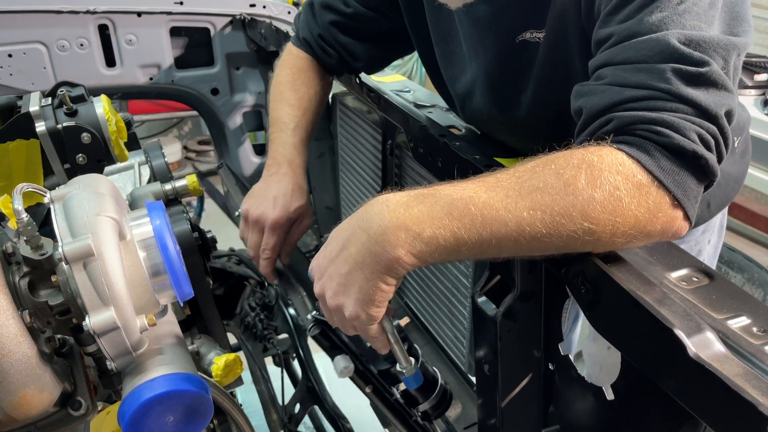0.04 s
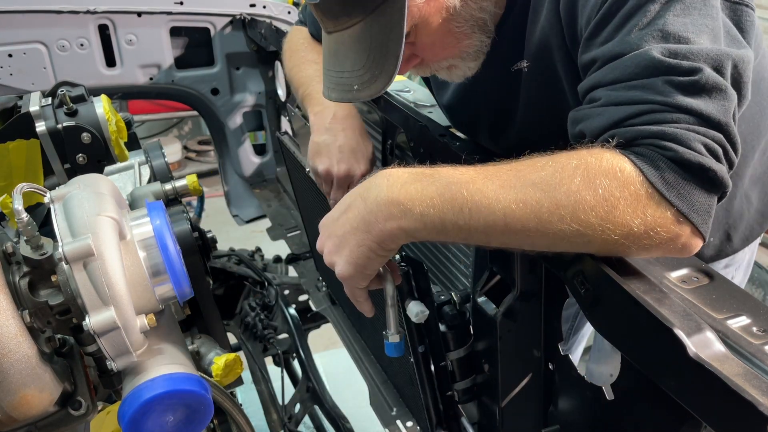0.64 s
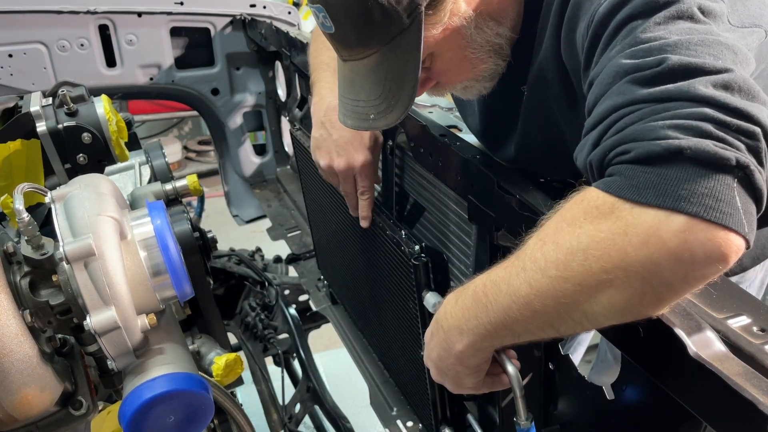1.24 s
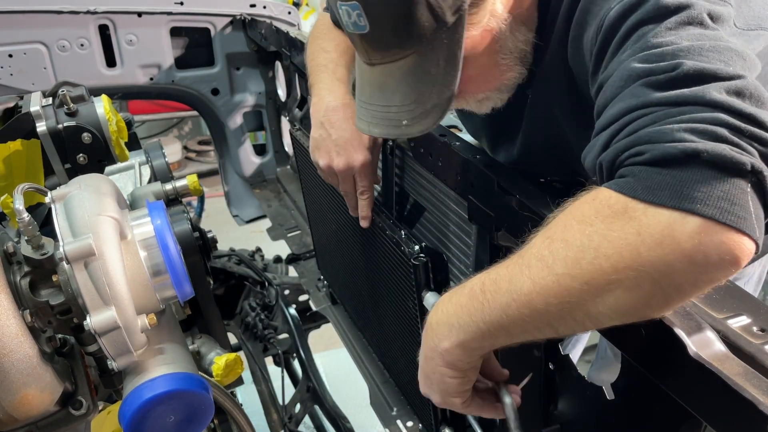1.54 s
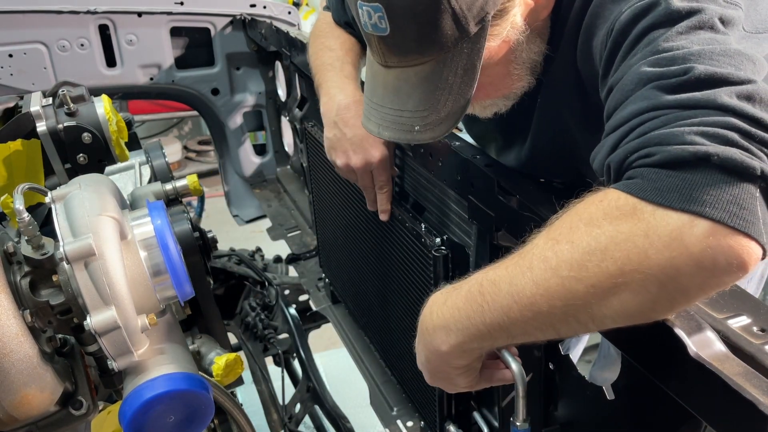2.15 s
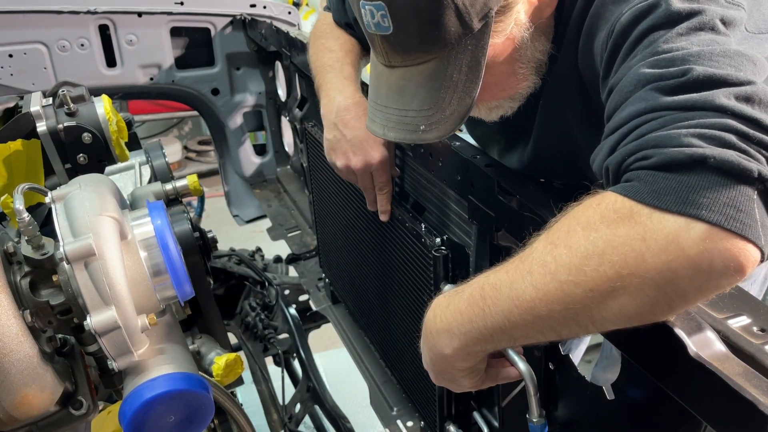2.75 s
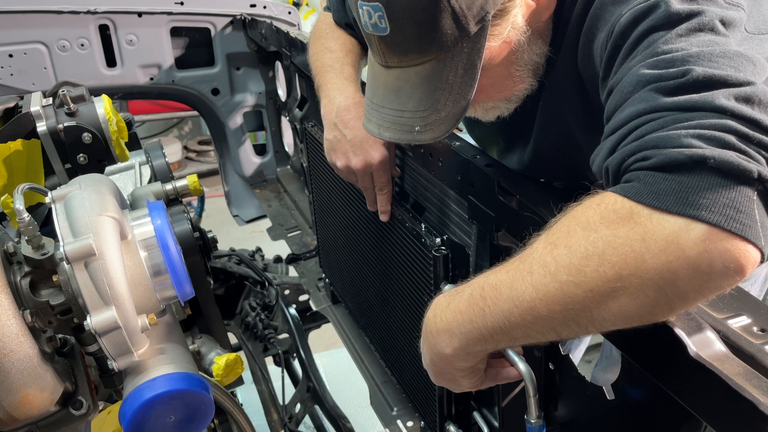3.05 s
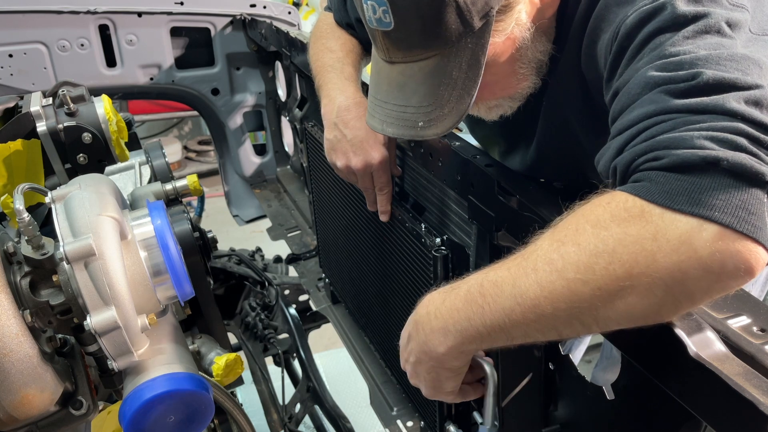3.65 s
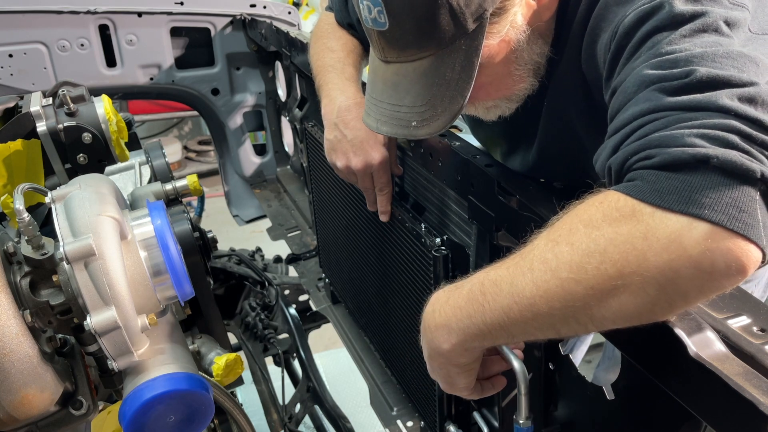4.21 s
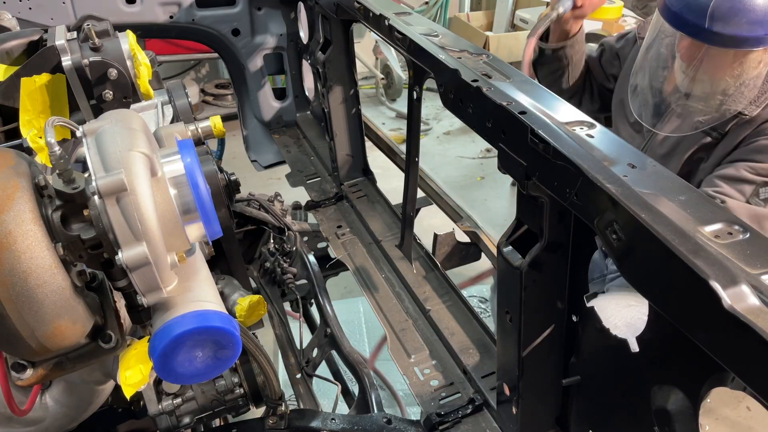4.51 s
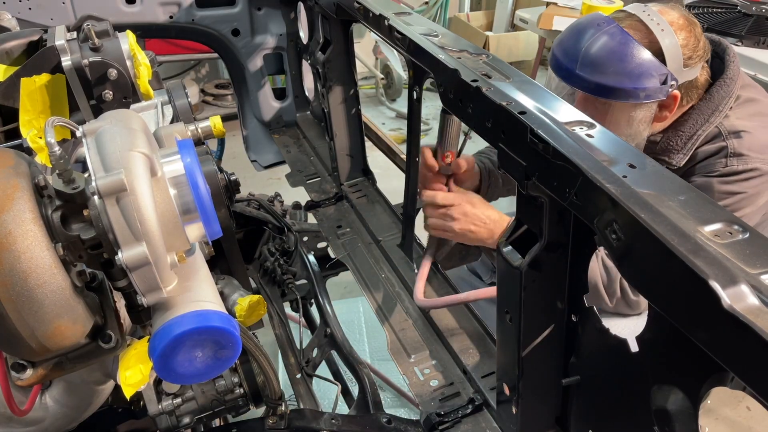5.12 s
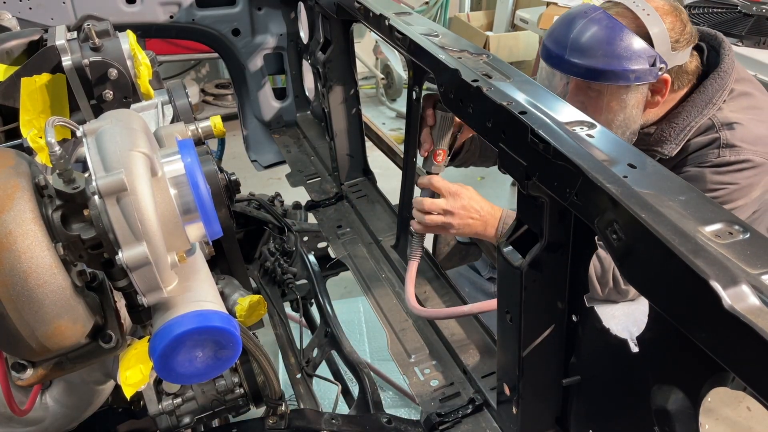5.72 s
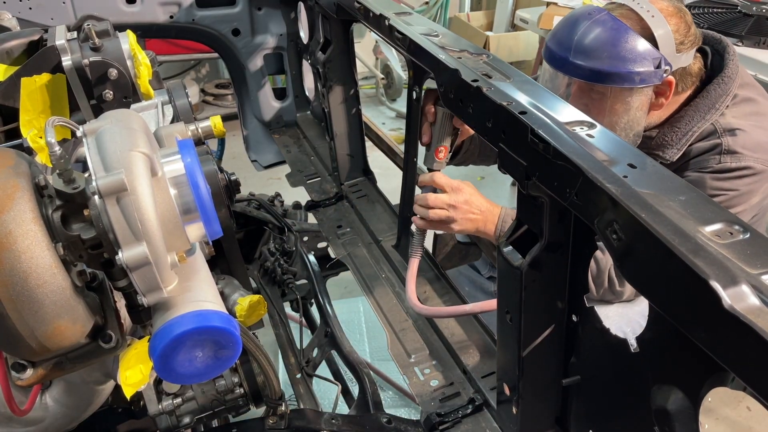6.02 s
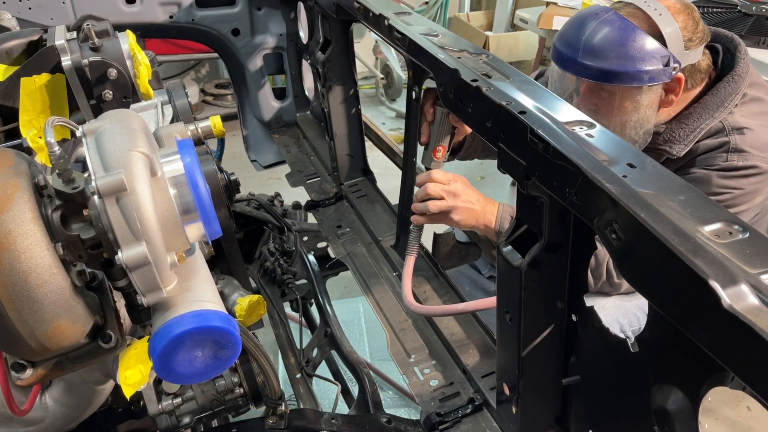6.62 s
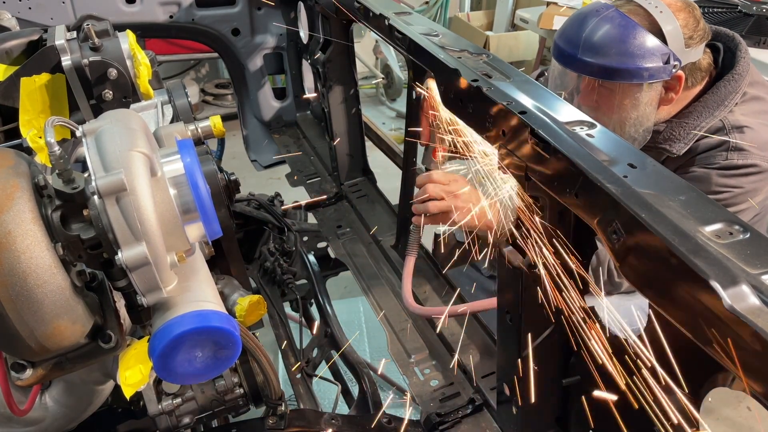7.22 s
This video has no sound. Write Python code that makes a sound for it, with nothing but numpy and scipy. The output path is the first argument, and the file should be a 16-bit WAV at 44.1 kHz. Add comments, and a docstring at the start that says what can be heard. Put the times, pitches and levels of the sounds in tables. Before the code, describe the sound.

A metal pipe knocks over a low fan hum, then a blower roars, air hisses and a pneumatic grinder cuts into steel and whines.

```python
"""In a garage, at a car's front frame. A fan hums, a sleeve rustles and a metal pipe knocks against the
radiator, exciting the damped modes of both. Abruptly a blower roars and a jet hisses from an air hose
while a cut-off grinder is set against the frame. Its disc bites, nearly stalls and drives the steel
into resonance, then spins up to a whine, a harmonic series on the spindle rate that sags under load."""
import sys
import numpy as np
from scipy import signal
from scipy.fft import rfft, irfft, next_fast_len
from scipy.io import wavfile
from scipy.ndimage import uniform_filter1d

SR = 44100
rng = np.random.default_rng(int(sys.argv[2]) if len(sys.argv) > 2 else 0)


def transcribe(signal):
    """Save signal, clipped to [-1, 1], as a 16-bit WAV file at the path in sys.argv[1]."""
    frames = np.atleast_2d(signal).T
    limited = np.clip(frames, -1, 1)
    pcm = np.round(limited * 32767).astype(np.int16)
    wavfile.write(sys.argv[1], SR, pcm)


N = 324576
T = np.arange(N) / SR

# Levels in a table are relative to one another; noise spectra give level per unit bandwidth.
# spindle rate, dragged down whenever the disc digs in: t/s, f/Hz
SPINDLE_RATE = [(6.235, 50), (6.31, 109), (6.455, 115), (6.505, 142), (6.565, 147), (6.65, 103), (6.69, 96),
                (6.72, 150), (6.75, 255), (6.79, 347), (6.84, 422), (6.88, 434), (6.922, 420), (7.004, 377),
                (7.105, 282), (7.145, 264), (7.235, 366), (7.295, 368), (7.36, 359)]
# grinding under the push of the hand: t/s, level/dB
PUSH_LEVEL = [(6.23, -18), (6.38, -19.5), (6.495, -26.5), (6.6, -22.5), (6.79, -22), (6.86, -33),
              (7.0, -32), (7.1, -31), (7.22, -34.5), (7.36, -47)]
# spans in which the disc runs without snatching: start/s, end/s
EASY_SPANS = [(6.821, 6.92), (7.219, 7.36)]
# tone of the rotor vanes: t/s, level/dB
VANE_LEVEL = [(6.24, -34), (6.31, -32), (6.39, -40.5), (6.53, -32.5), (6.7, -36.5), (6.86, -42.5),
              (7.02, -36.5), (7.13, -39), (7.3, -42)]
# partials of the whine: multiple of the spindle rate, level/dB
WHINE_ORDERS = [(1, -25), (2, -18), (3, -17), (5, -7.5), (6, -8.5), (7, -15), (8, -1), (9, -6), (10, -19),
                (11, -7), (12, -8.5), (13, -10), (14, -5), (15, -14), (16, -3.5), (17, -9), (18, -5.5),
                (19, -19), (20, -13), (22, -9), (23, -21), (24, -11), (25, -19), (26, -12), (28, -5),
                (29, -16), (32, -10), (33, -11), (34, -18), (35, -10), (37, -19), (42, -10), (44, -12)]
# modes of the steel frame: f/Hz, bandwidth/Hz, level/dB
FRAME_MODES = [(1016, 45, -13), (1364, 17, -1), (1557, 12, -3.5), (1730, 60, -13), (2304, 19, -2),
               (2474, 16, 2.5), (2990, 30, -8.5), (3255, 41, -2), (3360, 20, -3), (3414, 59, -5.5),
               (3846, 42, 0), (4030, 52, -9), (4620, 68, -5), (4920, 52, -11), (5750, 63, -10),
               (6170, 25, -2), (6500, 58, -12.5), (6780, 64, -12.5), (7180, 44, -10.5), (7600, 51, -7),
               (7960, 37, -7), (8120, 60, -12), (9090, 21, -7.5), (9530, 55, -16), (9560, 50, -10),
               (9860, 41, -11), (10600, 70, -13), (10750, 62, -17), (11130, 100, -12)]
# abrasion noise: f/Hz, level/dB
GRIT_SPECTRUM = [(180, -39), (300, -21), (565, -9), (624, -8), (1870, -3), (2400, 0.5), (2700, -4.5),
                 (3290, -11), (4300, -0.5), (6000, -3.5), (16000, -15)]
# spent air: f/Hz, level/dB
EXHAUST_SPECTRUM = [(240, -41), (400, -3), (453, -33), (839, -18), (949, -26), (1380, -5), (2710, 0),
                    (3870, -20), (4240, -8), (4580, -8.5), (16000, 4.5)]
# resonances of the exhaust ports: f/Hz, bandwidth/Hz, level/dB
PORT_MODES = [(7850, 210, -13), (10950, 430, -0.5), (12830, 350, -2), (15550, 400, -3)]
# the disc chatters on a resonance of the frame: t/s, duration/s, f/Hz, level/dB
CHATTER_SQUEALS = [(6.262, 0.052, 3290, -27), (6.297, 0.033, 2480, -35), (6.305, 0.12, 6105, -31.5),
                   (6.335, 0.058, 3260, -27), (6.345, 0.065, 2470, -29.5), (6.36, .11, 3410, -28.5),
                   (6.435, 0.036, 3880, -31), (6.515, .04, 3880, -31), (6.545, 0.05, 2475, -36),
                   (6.96, 0.085, 4640, -35.5)]
# the tool touches the frame: t/s, scrape/dB, chime/dB, ring/dB, ring f/Hz, scrape and ring t60/s
TOOL_TAPS = [(4.787, -46, -37.5, -31, 1914, 0.23), (4.805, -39, -37.5, -35.5, 1927, 0.35),
             (4.86, -33.5, -33, -35.5, 1780, 0.34), (5.01, -36, -42, -38, 983, 0.35),
             (5.021, -44, -39, -35, 7280, 0.1), (5.14, -45.5, -54, -47, 1430, 0.14),
             (5.262, -31.5, -40, -35.5, 2100, 0.12), (5.398, -36.5, -48, -40, 1346, 0.17),
             (5.499, -44.5, -54, -40.5, 1388, 0.11), (5.889, -45, -50, -42.5, 3260, 0.15)]
# modes of the grinder's body: f/Hz, level/dB
HOUSING_MODES = [(1790, -6), (2400, -11), (2930, -9.5), (3440, -12), (3930, -9), (4400, -11), (5380, -9),
                 (5990, -5.5), (7200, -11.5), (9300, -12)]
# pipe on radiator: t/s, crack/dB, clunk/dB, clatter/dB, sizzle/dB, clatter t60/s
PIPE_KNOCKS = [(1.041, -31, -45, -52.5, -61, 0.24), (1.084, -37, -54, -48.5, -39.5, 0.43),
               (1.155, -34, -45, -31.5, -26.5, .16), (1.481, -59, -75, -57, -72, 0.12),
               (1.512, -67, -62, -51, -76, 0.22), (1.845, -49.5, -71, -76, -67, 1),
               (1.991, -41, -31.5, -34.5, -41, 0.16), (2.101, -62, -34.5, -47.5, -66, 0.11),
               (2.165, -66, -46.5, -56, -66, 0.2), (4.124, -38.5, -51, -63, -52, 0.19)]
# ringing partials of the radiator, struck by the pipe: t/s, f/Hz, level/dB
RADIATOR_RINGS = [(1.045, 1190, -33), (1.088, 650, -39.5), (1.16, 2400, -34), (1.998, 843, -23),
                  (1.997, 1332, -29), (1.993, 2864, -36), (1.993, 3876, -43), (1.995, 390, -30),
                  (2.091, 1330, -49)]
# modes of the radiator and of the pipe: f/Hz, bandwidth/Hz, level/dB
RADIATOR_MODES = [(382, 79, 1.5), (540, 78, 3), (660, 92, -0.5), (844, 41, 6), (1163, 43, 0.5),
                  (1339, 20, 1), (1490, 88, -8), (1670, 26, -3.5), (1930, 94, -8)]
PIPE_MODES = [(1990, 600, 5.5), (2560, 290, 6), (2910, 280, 4), (4180, 820, -2.5), (5330, 1400, -9.5)]
# hiss of the moving hose: t/s, level/dB, midrange lift/dB
LEAK_LEVEL = [(4.345, -55.5, 8), (4.465, -42.5, 3), (4.54, -50, 3), (4.72, -38, 2), (4.95, -40, 3.5),
              (5.16, -38.5, 0), (5.28, -40.5, 1), (5.44, -38.5, -2.5), (5.75, -41, -1), (6.15, -43, 0.5)]
# jet at the coupling: f/Hz, level/dB
LEAK_SPECTRUM = [(880, -18), (1500, -10.5), (2720, -11.5), (3220, -8.5), (5540, -12), (8400, -7.5),
                 (10200, -7), (12900, -2), (15200, 0.5), (16000, -4)]
# centre of the jet's breathy whistle: t/s, f/Hz
LEAK_PITCH = [(4.45, 14440), (4.76, 15300), (4.9, 14000), (5.05, 14000), (5.18, 12700), (5.3, 15000),
              (5.42, 13500), (5.78, 13100), (6.1, 14300)]
# the blower's air noise, duct tones and mains hum: f/Hz, level/dB
BLOWER_SPECTRUM = [(25, -79), (45, -27), (64, -2.5), (90, -5), (120, 1.5), (155, 3.5), (210, -6.5),
                   (260, 2.5), (385, -0.5), (460, -5), (690, -5), (780, -13.5), (900, -15), (1150, -19.5),
                   (1600, -27), (4000, -34)]
DUCT_TONES = [(145, -44.5), (376.8, -37.5), (414.5, -44.5), (479.1, -49), (597.5, -45), (672.9, -44),
              (802.1, -54)]
MAINS_TONES = [(119.0, -39.5), (241.0, -43.5)]
# swishes of the sleeve: t/s, hold/s, level/dB
SWISHES = [(0.08, 0.084, -61.5), (0.24, 0.061, -52.5), (0.463, 0.045, -62), (0.702, 0.049, -55.5),
           (0.823, 0.025, -62.5)]
# rubbing cloth: f/Hz, level/dB
CLOTH_SPECTRUM = [(530, -33), (900, -5), (1030, -2), (4150, -6.5), (7490, -13), (15200, -13.5), (16000, -9)]
# the fan's tones and air noise: f/Hz, level/dB
FAN_TONES = [(113.0, -53), (140.0, -54.5), (166.9, -55), (242.2, -57), (306.8, -64.5), (393.0, -74.5),
             (419.9, -74), (452.2, -69)]
FAN_SPECTRUM = [(15, -87), (25, -47.5), (102, -7), (170, -2), (200, -12.5), (236, -5.5), (270, -14.5),
                (309, -20.5), (335, -17.5), (451, -21), (489, -26.5), (607, -26.5), (1190, -38.5),
                (5140, -49.5), (16000, -65)]
# the fan's whistles: f/Hz, bandwidth/Hz, level/dB
FAN_RESONANCES = [(1523, 45, -78.5), (5230, 580, -81)]
# left-right coherence of the fan's air and of the other noises: f/Hz, coherence
FAN_COHERENCE = [(60, 0.97), (180, 1), (550, 0.67), (1650, 0.0), (4970, 0.14), (15000, 0.52)]
COHERENCE = [(60, 1), (130, 0.99), (290, 0.93), (640, 0.58), (1400, 0.41), (3000, 0.55), (7000, 0.5),
             (14000, 0.67)]
# level difference from the place of work: f/Hz, left minus right/dB
EAR_DIFFERENCE = [(60, 0.0), (150, 1), (380, -3), (950, 3.5), (2380, 0), (5980, 1.5), (15000, 1.5)]

FULL_SPEED_HZ, TRIGGER_S = 430, 6.23   # the grinder's nominal spindle rate and its start
BLOWER_START_S = 4.321


def grinder():
    """Rotating machinery: a four-vane air motor turns the disc; speed and push govern its sound."""
    speed = uniform_filter1d(in_time(SPINDLE_RATE)[0], size=SR // 30)
    octaves = np.log2(speed / FULL_SPEED_HZ)
    grind_db = grinding_db()
    easy = sum(after(start_s, 0.026) - after(end_s, 0.026) for start_s, end_s in EASY_SPANS)
    running = after(TRIGGER_S, rise_s=0.024)
    # snatching modulates the speed and blurs the upper partials, most when the motor labours
    flutter = (.004 + .018 * np.minimum(octaves ** 2, 1)) * (1 - easy) + .0015 * easy
    angle = 2 * np.pi * np.cumsum(speed * (1 + flutter * drift(450))) / SR
    motor = running * (vanes(angle, speed, easy) + whine(angle, octaves, grind_db, easy))
    rush = abrasion(angle, speed, grind_db) + exhaust(angle, octaves, grind_db, running)
    rush *= from_db(-2.5 * easy)
    return garage(motor, wet_db=-3, t60=0.18, shared=0.68) + band(rush, 220, 15300, order=1)


def grinding_db():
    """Contact force sets the grinding level: the disc grazes, bites, then follows the hand."""
    push_db, = in_time(PUSH_LEVEL)
    graze_db = -1398 * np.maximum(6.233 - T, 0)
    bite_db = 5 * np.exp(-((T - 6.243) / 0.01) ** 2)
    return push_db + graze_db + bite_db


def whine(angle, octaves, grind_db, easy):
    """Forced vibration: harmonics of the spindle rate swell as they pass through resonances."""
    pressure = np.minimum(from_db(grind_db + 29), 1)
    snatching = 1 - easy
    speed_db = 14 * octaves
    whine_db = -29.3 + speed_db - 3 * pressure ** 2 * snatching   # a hard push smothers the whine
    tone, on = np.zeros(N), T > TRIGGER_S
    for k in np.setdiff1d(np.arange(1, 45), 4):   # the vanes supply the fourth harmonic
        level_db = whine_db[on] + np.interp(k, *np.transpose(WHINE_ORDERS)) + 2 * drift(40, T[on])
        level_db += 4 * snatching[on] * drift(110, T[on])
        # the rim's grit repeats every turn, adding partials that peak at the twelfth
        above_peak = np.log2(k / 12)
        rim_db = -36.5 + min(12 * above_peak, -5 * above_peak)
        rim = pressure[on] * snatching[on] * from_db(rim_db + speed_db[on] + 5 * drift(110, T[on]))
        tone[on] += np.hypot(from_db(level_db), rim) * np.sin(k * (angle[on] + 2 * np.pi * rng.random()))
    tone *= 1 + .3 * pressure * drift(600)   # rasp under pressure
    # the disc screams only near full speed
    disc = from_db(7 + 60 * octaves) * resonate(tone, hz=3850, width_hz=220)
    frame = from_db(4) * body(pressure * snatching * tone, FRAME_MODES)
    muffler = from_db(13) * resonate((1 - pressure) ** 2 * tone, hz=12780, width_hz=220)
    return tone + disc + frame + muffler


def vanes(angle, speed, easy):
    """Vane-passing tone at four times the spindle rate, roughened by amplitude modulation."""
    level_db, = in_time(VANE_LEVEL)
    roughness = .6 * (1 - easy) * np.sqrt(speed / FULL_SPEED_HZ) * (drift(70) + drift(300))
    return from_db(level_db) * np.sqrt(2) * np.sin(4 * angle) * (1 + roughness)


def abrasion(angle, speed, grind_db):
    """Friction noise from the grit excites the frame's modes, each flaring and fading on its own."""
    # the disc is slightly out of true and presses hardest once a turn
    contact = rms_one(from_db(2.5 * np.cos(angle) + 0.88 * drift(160)))
    scrape = noise([(100, 0), (16000, 0)]) * contact
    flaring_modes = [(hz, width, db + 2 * drift(45)) for hz, width, db in FRAME_MODES]
    grab = from_db(1.5 - 2.2 * speed / 100)   # a slow disc grabs the frame; a fast one skims it
    ringing = grab * rms_one(body(scrape, flaring_modes))
    grit = from_db(-5.5) * noise(GRIT_SPECTRUM, grain_db=0.5) * contact
    return from_db(grind_db) * (ringing + grit)


def exhaust(angle, octaves, grind_db, running):
    """Turbulent spent air and sparks hiss, pulsed once per vane and coloured by port resonances."""
    air_gain = running * from_db(-25.5 + 4 * octaves)
    spark_gain = from_db(grind_db + 6 + 6 * octaves)
    puffs = 1 + .25 * np.cos(4 * angle)
    hiss = np.hypot(air_gain, spark_gain) * noise(EXHAUST_SPECTRUM, grain_db=-1.0) * puffs
    ports = sum(from_db(db) * resonate(hiss, hz, width) for hz, width, db in PORT_MODES)
    return from_db(-1.3) * (hiss + ports)


def squeals():
    """Self-excited vibration: the disc chatters on the frame's resonances in short rasping swells."""
    out = np.zeros(N)
    for s, length_s, hz, db in CHATTER_SQUEALS:
        t = T[:int(length_s * SR)]
        tone = np.sin(2 * np.pi * np.cumsum(hz + 36 * drift(420, t)) / SR)
        rasp = .9 + .5 * drift(300, t)
        swell = np.sqrt(2 * np.abs(np.sin(np.pi * t / length_s)))
        add(out, s, from_db(db) * tone * rasp * swell)
    return out


def valve(open_s=6.206):
    """Throttling noise: the valve spits air just before the motor turns."""
    spit = rms_one(band(noise([(100, 0), (16000, 0)]), 4300, 7200))
    return from_db(-41) * spit * after(open_s, 0.0035) * dying(np.maximum(T - open_s, 0), 0.35)


def clinks(ring_q=79):
    """Impact and sliding friction: the tool chimes on the frame, and its skid rings one resonance."""
    out, t = np.zeros(N), T[:SR // 2]
    for s, scrape_db, chime_db, ring_db, hz, t60 in TOOL_TAPS:
        grit = rng.standard_normal(len(t)) * grains(3.2, len(t))
        scrape = from_db(scrape_db) * rms_one(band(grit, 530, 2600))
        ring = from_db(ring_db) * rms_one(resonate(grit, hz, hz / ring_q))
        # each new grip detunes the body a little, and contact chatter roughens its ring
        chime = sum(from_db(chime_db + db + rng.normal(0, 2))
                    * np.sin(2 * np.pi * mode_hz * rng.normal(1, .008) * t + drift(400, t))
                    for mode_hz, db in HOUSING_MODES)
        add(out, s, (scrape + ring) * struck(t, 0.0025, t60) + chime * struck(t, 0.0025, 0.68 * t60))
    return garage(out, wet_db=-3.5, t60=0.21, shared=0.15)


def knocks():
    """Impact excitation: after a crack, radiator and pipe rattle on, the treble damped soonest."""
    out, t = np.zeros(N), T[:SR // 2]
    for s, crack_db, clunk_db, clatter_db, sizzle_db, t60 in PIPE_KNOCKS:
        white = rng.standard_normal((4, len(t)))
        crack = rms_one(band(white[0], 1200, 21500, order=1)) * dying(t, 0.015)
        clunk = rms_one(body(white[1], RADIATOR_MODES)) * struck(t, 0.056, 1.87 * t60)
        clatter = rms_one(body(white[2], PIPE_MODES)) * struck(t, 0.0053, t60)
        sizzle = rms_one(band(white[3], 3200, 9100)) * struck(t, 0.0086, 0.31 * t60)
        add(out, s, from_db(crack_db) * crack + from_db(clunk_db) * clunk
            + from_db(clatter_db) * clatter + from_db(sizzle_db) * sizzle)
    return garage(out, wet_db=-5.0, t60=0.22, shared=0.37)


def clanks():
    """Damped free vibration: single partials of the struck radiator swell and die away."""
    out, t = np.zeros(N), T[:SR // 2]
    for s, hz, db in RADIATOR_RINGS:
        tone = np.sin(2 * np.pi * hz * t + 0.48 * drift(194, t))
        add(out, s, from_db(db) * tone * struck(t, rise_s=0.096, t60=0.19))
    return out


def leak():
    """Jet noise: air escapes from the coupling in a thin hiss whose colour shifts as the hose moves."""
    level_db, middle_db = in_time(LEAK_LEVEL)
    whistle_hz, = in_time(LEAK_PITCH)
    jet = noise(LEAK_SPECTRUM)
    jet += (from_db(middle_db) - 1) * band(jet, 1300, 7500, order=1)
    # low-frequency noise shifted up to the whistle's pitch
    real, imaginary = band(rng.standard_normal((2, N)), 20, 750)
    carrier = np.exp(2j * np.pi * np.cumsum(whistle_hz) / SR)
    whistle = rms_one(np.real((real + 1j * imaginary) * carrier))
    return from_db(level_db + 1.27) * (jet + from_db(-7) * whistle) * (1 - after(6.25, .2))


def blower(sink_s=6.194, sink_db=18):
    """Turbulent flow roars over duct tones and mains hum; just after 6.19 s the level sinks by about 18 dB."""
    sunk = 1 - np.exp(-np.maximum(T - sink_s, 0) / 0.26)
    duct = from_db(-35.46) * rms_one(hum(DUCT_TONES, waver=0.97, waver_hz=22))
    mains = hum(MAINS_TONES, waver=0.32, waver_hz=9)
    roar = from_db(-32) * noise(BLOWER_SPECTRUM)
    return from_db(-sink_db * sunk) * (roar + duct + mains)


def sleeve(rise_s=0.033, t60=0.85):
    """Friction of cloth in fine grains: swishes swell, hold and die away, adding in power."""
    power = np.zeros(N)
    for s, hold_s, db in SWISHES:
        release = dying(np.maximum(T - s - rise_s - hold_s, 0), t60)
        power += (from_db(db) * after(s, rise_s) * release) ** 2
    return np.sqrt(power) * from_db(-3.0 + 1.2 * drift(72.7)) * noise(CLOTH_SPECTRUM, grain_db=3.0)


def fan():
    """Tonal and broadband fan noise: beating low tones and faint whistles over moving air."""
    whistles = sum(from_db(db) * rms_one(resonate(rng.standard_normal((2, N)), hz, width))
                   for hz, width, db in FAN_RESONANCES)
    air = from_db(-47) * noise(FAN_SPECTRUM, coherence=FAN_COHERENCE)
    return from_db(0.5) * hum(FAN_TONES, waver=0.3, waver_hz=3.99) + air + whistles


def garage(x, wet_db, t60, shared):
    """Reverberation: direct sound plus dense reflections, partly common to both ears."""
    t = T[:SR // 2]
    diffuse = band(rng.standard_normal((3, len(t))), 510, 12300, order=1)
    common, left, right = diffuse * dying(t, t60) * (t > .002)
    echoes = shared * common + np.array([left, right])
    echoes /= np.sqrt(np.sum(echoes ** 2, axis=1, keepdims=True))
    return x + from_db(wet_db) * signal.fftconvolve(np.atleast_2d(x), echoes, axes=1)[:, :N]


def placed(x):
    """Interaural level difference, varying with frequency, sets a source a little to the left."""
    size = next_fast_len(N)
    lean_db = at_hz(EAR_DIFFERENCE, np.arange(size // 2 + 1) * SR / size)
    return irfft(rfft(x, size) * from_db(lean_db * [[.5], [-.5]]), size)[:, :N]


def hum(lines, waver, waver_hz):
    """Random modulation: steady tones waver in amplitude and phase."""
    out = np.zeros(N)
    for hz, db in lines:
        phasor = 1 + waver * (drift(waver_hz) + 1j * drift(waver_hz))
        out += from_db(db) * np.real(phasor * np.exp(2j * np.pi * (hz * T + rng.random())))
    return out * np.sqrt(2 / (1 + 2 * waver ** 2))


def noise(spectrum, grain_db=0, coherence=COHERENCE):
    """Spectral shaping of partly coherent stereo noise, optionally grainy; rms 1."""
    sizes = grains(grain_db, N)
    size = next_fast_len(N)
    hz = np.arange(size // 2 + 1) * SR / size
    mid, side = rfft(rng.standard_normal((2, N)) * sizes, size) * from_db(at_hz(spectrum, hz))
    alike = np.clip(at_hz(coherence, hz), 0, 1)
    stereo = np.sqrt(1 + alike) * mid + np.sqrt(1 - alike) * side * [[1], [-1]]
    return rms_one(irfft(stereo, size)[:, :N])


def grains(grain_db, count):
    """Random gains with exponentially distributed levels."""
    return from_db(grain_db * np.minimum(rng.exponential(1, count), 5))


def body(x, modes):
    """Modal superposition: resonances in parallel, alternating in sign."""
    return sum((-1) ** k * from_db(db) * resonate(x, hz, width) for k, (hz, width, db) in enumerate(modes))


def resonate(x, hz, width_hz):
    """A damped oscillator with unit peak gain."""
    r = np.exp(-np.pi * width_hz / SR)
    poles = [1, -2 * r * np.cos(2 * np.pi * hz / SR), r * r]
    return signal.lfilter(np.array([1, 0, -1]) * (1 - r * r) / 2, poles, x + 1e-18)


def band(x, low_hz, high_hz, order=2):
    """Maximally flat band-pass."""
    edges = [low_hz, min(high_hz, SR / 2 - 1000)]
    return signal.sosfilt(signal.butter(order, edges, "band", fs=SR, output="sos"), x)


def drift(rate, t=T):
    """Random fluctuation of unit variance, with `rate` new values a second."""
    knots = rng.standard_normal(N // 32)
    return np.interp(t * rate, np.arange(len(knots)), knots) * np.sqrt(3 / 2)


def struck(t, rise_s, t60):
    """Exponential build-up and decay."""
    return dying(t, t60) * (1 - dying(t, rise_s))


def dying(t, t60):
    """Exponential decay, 60 dB in t60."""
    return np.exp(-np.log(1000) * t / max(t60, 1e-3))


def after(start_s, rise_s):
    """A ramp from 0 to 1."""
    return np.clip((T - start_s) / rise_s, 0, 1)


def in_time(rows):
    """Each column of a curve at every sample."""
    s, *columns = np.transpose(rows)
    return [np.interp(T, s, column) for column in columns]


def at_hz(points, hz):
    """Interpolation on a log-frequency axis."""
    table = np.array(points)
    return np.interp(np.log(hz + 1e-9), np.log(table[:, 0]), table[:, 1])


def from_db(db):
    """Decibels to gain."""
    return 10 ** (np.asarray(db) / 20)


def rms_one(x):
    """Scale to unit power."""
    return x / np.sqrt(np.mean(x ** 2) + 1e-20)


def add(out, s, sound):
    """Mix a sound in at time s."""
    start = round(s * SR)
    out[..., start:start + sound.shape[-1]] += sound[..., :N - start]


def scene():
    """Superposition of the sources: quiet handwork, then the blower and the grinder."""
    loud = after(BLOWER_START_S, .003)
    background = fan() * (1 - loud) + (blower() + leak()) * loud
    handwork = sleeve() + knocks() + clinks()
    tool = valve() + grinder()
    ringing = garage(clanks() + squeals(), wet_db=-5.5, t60=0.069, shared=0.23)
    return background + handwork + placed(tool + ringing)


def record(dry, cutoff_hz=15780):
    """Soft saturation rounds the highest peaks; a steep low-pass cuts the top."""
    return signal.sosfilt(signal.ellip(12, .1, 90, cutoff_hz, fs=SR, output="sos"), np.tanh(dry))


dry = scene()
out = record(dry)
transcribe(out)
```